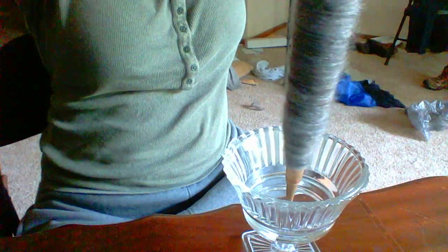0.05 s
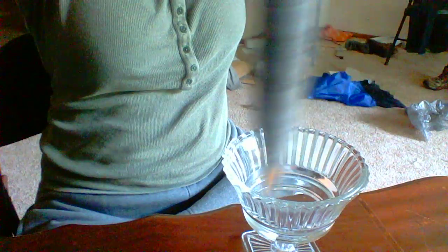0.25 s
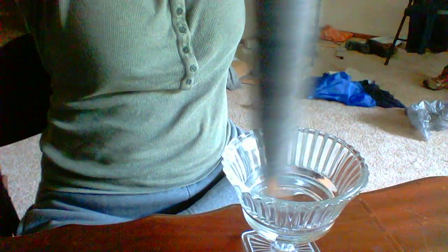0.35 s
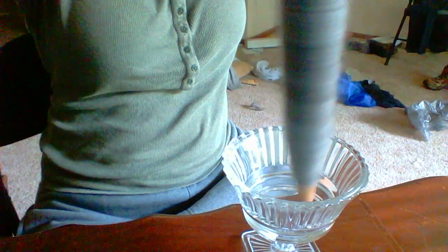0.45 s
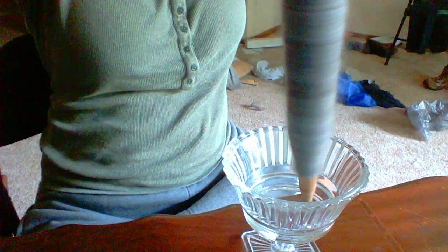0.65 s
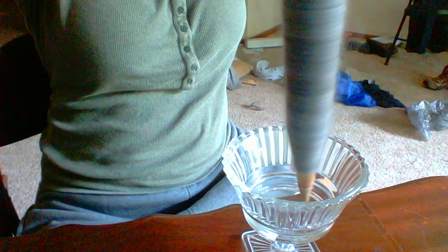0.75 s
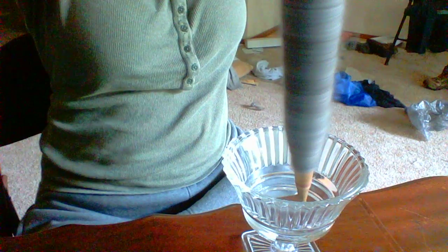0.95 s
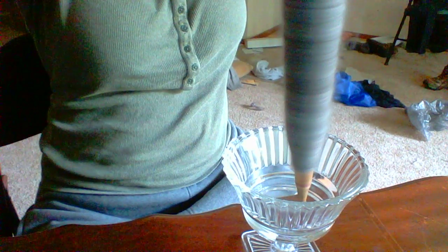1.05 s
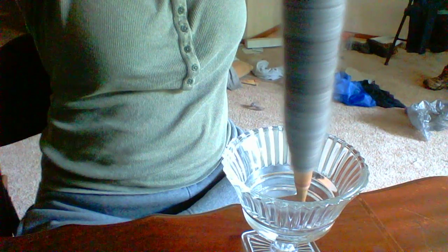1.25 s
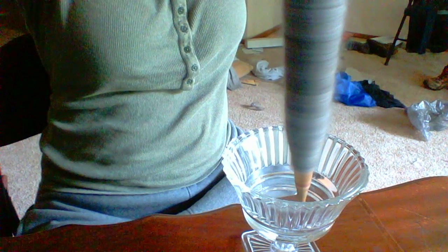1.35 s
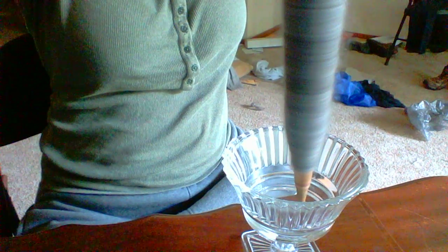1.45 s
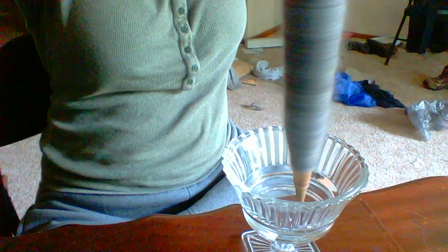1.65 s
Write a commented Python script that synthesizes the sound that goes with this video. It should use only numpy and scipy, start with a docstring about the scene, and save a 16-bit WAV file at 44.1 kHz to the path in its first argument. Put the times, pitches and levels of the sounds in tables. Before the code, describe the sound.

A wooden spindle knocks hard against a glass bowl and briefly rattles, then twirls with a low, slowing rumble and faint rubbing on the glass. A small close microphone indoors overloads on the knock, over light hiss.

```python
"""Spindle in a glass bowl

A wooden spindle is flicked into a spin in a glass bowl on a wooden table. Its tip ticks, knocks hard
against the bowl, rebounds and settles. It then twirls, shaking the table and rubbing the glass once
a turn as it slows. A small nearby microphone overloads on the knock.
Underneath: hiss, rumble, hum and a faint pulsing whine."""
import sys
import numpy as np
from scipy.fft import rfft, irfft, next_fast_len
from scipy.io import wavfile
from scipy.ndimage import map_coordinates

SR = 44100
rng = np.random.default_rng(int(sys.argv[2]) if len(sys.argv) > 2 else 0)


def log_audio(samples):
    """Write samples as a 16-bit WAV file to the path given in sys.argv[1]."""
    # one column per channel
    frames = np.atleast_2d(samples).T
    # limit to full scale, then quantise
    limited = np.clip(frames, -1, 1)
    pcm = np.round(limited * 32767).astype(np.int16)
    wavfile.write(sys.argv[1], SR, pcm)


N = 74970

# hiss spectrum: freq_hz, relative_db
HISS_SPECTRUM = [(200, 3.5), (400, -5), (800, -7), (1500, -8), (3000, -13), (6000, -15), (9000, -17.5),
                 (11000, -24.5), (13000, -36), (15500, -81)]
# room rumble spectrum: freq_hz, relative_db
RUMBLE_SPECTRUM = [(15, -1), (28, 3), (45, 2), (85, 10.5), (130, -1.5), (220, -11), (330, -14.5),
                   (700, -49.5)]
# hum envelope: time_s, level_db
HUM_LEVEL = [(0, -34.5), (.12, -34.5), (.22, -41.5), (.62, -51), (.85, -36), (1.05, -38), (1.28, -43),
             (1.52, -36), (1.7, -49)]
# table rocking envelope: time_s, level_db
SWAY_LEVEL = [(.13, -44), (.195, -28), (.232, -11), (.258, -17), (.275, -28.5), (.305, -1), (.36, -7.5),
              (.435, -6.5), (.465, -24), (.53, -16), (.58, -60)]
# light touches of the tip: start_s, level_db, pitch_hz
TIP_TICKS = [(0.206, -30, 4600), (0.2227, -14, 2200)]
# lightly touched glass: freq_hz, relative_db, t60_s
GLASS_MODES = [(1100, 1.5, 0.035), (1824, -4, 0.034), (1960, -16, 0.23), (2270, -1, 0.032)]
# blows of the tip: start_s, gain_db, lowpass_hz
TIP_KNOCKS = [(0.2772, 2.5, 2560), (0.2818, -0.5, 5040), (.2892, -9.5, 5000), (0.3376, -0.5, 860),
              (.388, -22.5, 910), (0.465, -17.5, 333)]
# bowl on the table: freq_hz, relative_db, t60_s
BOWL_MODES = [(86.9, -6.5, 0.57), (101.4, -5, 0.52), (152.5, -20, 0.99), (200.8, -23.5, 0.73),
              (277.3, -3.5, 0.28), (301.7, -0.5, 0.13), (360.6, -2.5, 0.2), (496.1, -4, 0.12),
              (600, -20, 0.31), (671, -18.5, 0.44), (786.6, 2.5, 0.085), (809, -16.5, 0.3),
              (1104, -7, 0.087), (1500, -8, 0.038), (2236, -19, 0.031)]
# clatter of a blow: freq_hz, relative_db
CLATTER_SPECTRUM = [(200, 8), (800, 11.5), (1100, -3), (2200, 11), (2700, -48), (3300, -22), (4200, -43),
                    (10000, -26), (16000, -39)]
# dense ringing of table and room: freq_hz, relative_db
BOOM_SPECTRUM = [(100, 3), (200, -8.5), (280, 9), (380, 9.5), (450, -11.5), (640, 1), (820, 2.5),
                 (920, -13), (2200, -28), (4000, -36)]
# contacts of the pressed tip: start_s, level_db, pitch_hz
TIP_CHATTER = [(0.2792, -9, 3400), (.2835, -2.5, 3000), (0.2913, -8.5, 3200), (0.3055, -19, 1900),
               (0.3288, -19, 1470), (0.3377, -19, 1400), (0.3416, -11.5, 1400), (0.344, -15, 1500),
               (0.3519, -11, 1450), (0.3581, -12, 1400), (0.3896, -20, 1310)]
# spindle speed: time_s, turns_per_s
SPIN_SPEED = [(.55, 31), (.62, 29.2), (.7, 27.8), (.8, 27), (.95, 26.2), (1.03, 25.3), (1.15, 22),
              (1.28, 21.5), (1.41, 19), (1.52, 20), (1.7, 19.3)]
# twirl envelopes: time_s, even_shake_db, odd_shake_db, rub_db, sing_db
TWIRL_LEVELS = [(.1, -68, -59, -61, -81), (.22,  -52, -34, -45.5, -71), (.42, -45, -41.5, -44, -72),
                (.58, -23.5, -53, -47.5, -53.5), (.66, -22, -48, -47, -37.5), (.79, -20.5, -52, -44, -41),
                (.89, -17.5, -33, -41, -36), (.98, -19, -34.5, -42, -38), (1.1, -26.5, -32.5, -47, -53.5),
                (1.24, -48, -32, -51.5, -59.5), (1.32, -35, -35.5, -67, -61), (1.4, -44, -27, -44.5, -53),
                (1.47, -40, -32, -52, -52.5), (1.57, -21, -34.5, -44.5, -54.5), (1.7, -43, -35.5, -59, -72)]
# shaking force at 1, 2, 3... times the spin rate: relative_db
SHAKE_ORDERS = [-25.5, 13, 1, -1.5, -5.5, -8, -10.5, -0.5]
# table resonances: centre_hz, width_hz, relative_db
TABLE_PEAKS = [(58.6, 12.7, -4.5), (114, 15.9, 0.5), (185, 35.4, -12)]
# rubbed glass resonances: centre_hz, width_hz, relative_db
RUB_PEAKS = [(287.7, 20, 0), (357, 12.8, 6), (528, 57, -7.5), (661, 93, -8.5), (798.4, 27.4, -4.5),
             (1140, 240, -18)]
# nudged glass resonances: centre_hz, width_hz, relative_db
SING_PEAKS = [(349, 26, 1), (507, 32, 3), (785, 67, -6)]

TIME_S = np.arange(N) / SR


def amp(db):
    """Decibels to gain."""
    return 10 ** (np.asarray(db) / 20)


def unit(x):
    """Scale to rms 1."""
    return x / np.sqrt(np.mean(x ** 2) + 1e-20)


def curves(rows):
    """Per-sample curve for each column after time_s."""
    times_s, *columns = np.transpose(rows)
    return [np.interp(TIME_S, times_s, column) for column in columns]


def wobble(knots_per_s):
    """Smooth random curve."""
    return map_coordinates(rng.standard_normal(400), [TIME_S * knots_per_s], mode="mirror")


def filtered(x, response):
    """Apply a complex frequency response."""
    size = next_fast_len(N + SR // 2)
    return irfft(rfft(x, size) * response(np.fft.rfftfreq(size, 1 / SR)), size)[:N]


def noise(spectrum):
    """Shaped noise, rms 1."""
    freq_hz, db = np.transpose(spectrum)
    white = rng.standard_normal(N)
    return unit(filtered(white, lambda hz: amp(np.interp(np.log(hz + 1), np.log(freq_hz), db))))


def resonate(x, peaks):
    """Parallel band-pass resonances, alternating in sign."""
    def response(hz):
        total = 0
        for k, (centre_hz, width_hz, db) in enumerate(peaks):
            damping = 1j * hz * width_hz
            total += (-1) ** k * amp(db) * damping / (centre_hz ** 2 - hz ** 2 + damping)
        return total
    return filtered(x, response)


def decay(start_s, t60_s, rise_s=0.0005):
    """Fast rise, exponential fall."""
    age_s = np.maximum(TIME_S - start_s, 0)
    return (1 - np.exp(-age_s / rise_s)) * amp(-60 * age_s / t60_s)


def sine(hz, zero_s=0, phase_rad=0):
    """Sine with its phase counted from zero_s."""
    return np.sin(2 * np.pi * hz * (TIME_S - zero_s) + phase_rad)


def ringing(start_s, modes):
    """Struck modes; levels vary slightly per strike."""
    return sum((-1) ** k * amp(db + rng.normal(0, 1)) * decay(start_s, t60_s) * sine(hz, start_s)
               for k, (hz, db, t60_s) in enumerate(modes))


def click(start_s, hz, t60_s):
    """Hard contact: a few cycles, abrupt onset."""
    return decay(start_s, t60_s, rise_s=0.00005) * sine(hz, start_s)


def background():
    """Hiss, room rumble, wavering hum, faint pulsing whine."""
    hum_db, = curves(HUM_LEVEL)
    hum = amp(hum_db) * sine(hz=200, phase_rad=0.55 * wobble(24))
    pulse_period_s, pulse_peak_s = 0.0747, 0.84
    whine_db = -69.5 + 14 * np.cos(2 * np.pi * (TIME_S - pulse_peak_s) / pulse_period_s)
    whine = amp(whine_db) * sine(hz=3475, phase_rad=wobble(34.2))
    return amp(-47) * noise(HISS_SPECTRUM) + amp(-37) * noise(RUMBLE_SPECTRUM) + hum + whine


def table_sway():
    """Flick and knock rock the table."""
    sway_db, = curves(SWAY_LEVEL)
    return amp(sway_db) * sine(hz=56.4, zero_s=SWAY_LEVEL[0][0])


def ticks():
    """Light touches of the tip leave the glass free to ring."""
    return sum(amp(db) * (click(start_s, hz, t60_s=0.0065) + amp(-13) * ringing(start_s, GLASS_MODES))
               for start_s, db, hz in TIP_TICKS)


def knocks():
    """Each blow rings bowl and table, with a short clatter and a dense boom; late blows are duller."""
    out = np.zeros(N)
    for start_s, gain_db, lowpass_hz in TIP_KNOCKS:
        ring = amp(-4.5) * ringing(start_s, BOWL_MODES)
        clatter = amp(-6) * decay(start_s, t60_s=0.036) * noise(CLATTER_SPECTRUM)
        boom = amp(-5.5) * decay(start_s, t60_s=0.24) * noise(BOOM_SPECTRUM)
        blow = filtered(ring + clatter + boom, lambda hz: 1 / (1 + 1j * hz / lowpass_hz) ** 2)
        out += amp(gain_db) * blow
    return out


def chatter():
    """The tip cracks and chatters while pressed against the glass."""
    return sum(amp(db) * click(start_s, hz, t60_s=0.0025) for start_s, db, hz in TIP_CHATTER)


def table_shake(turns, even_db, odd_db):
    """Imbalance shakes the table at multiples of the spin rate, over a noisy grumble."""
    orders = [amp(db) * (1 + 0.1 * wobble(24.74)) * np.cos(2 * np.pi * order * turns)
              for order, db in enumerate(SHAKE_ORDERS, start=1)]
    grumble = amp(-18) * unit(resonate(rng.standard_normal(N), TABLE_PEAKS))
    odd = unit(resonate(sum(orders[::2]), TABLE_PEAKS)) + grumble
    even = unit(resonate(sum(orders[1::2]), TABLE_PEAKS)) + grumble
    return amp(even_db) * even + amp(odd_db) * odd


def glass_rub(turns):
    """Friction noise through the glass, swelling once a turn."""
    swing_db, lag_turns = 3.5, 0.29
    swell = amp(swing_db * np.cos(2 * np.pi * (turns - lag_turns)))
    return unit(resonate(rng.standard_normal(N), RUB_PEAKS) * swell)


def glass_sing(turns):
    """One slightly uneven nudge a turn makes the glass sing."""
    whole_turns = np.floor(turns)
    nudges = np.diff(whole_turns, append=whole_turns[-1]) * (1 + 0.1 * wobble(27.5))
    return unit(resonate(resonate(nudges, SING_PEAKS), SING_PEAKS))


def twirl():
    """The slowing spindle drives shake, rub and singing from one rotation."""
    turns_per_s, = curves(SPIN_SPEED)
    even_db, odd_db, rub_db, sing_db = curves(TWIRL_LEVELS)
    heavy_side_s = 0.868  # rotation phase zero
    turns = np.cumsum(turns_per_s) / SR
    turns -= np.interp(heavy_side_s, TIME_S, turns)
    shake = table_shake(turns, even_db, odd_db)
    return shake + amp(rub_db) * glass_rub(turns) + amp(sing_db) * glass_sing(turns)


def scene():
    """All sources, mono."""
    return (knocks() + table_sway() + ticks() + chatter() + twirl() + background())[None]


def record(dry):
    """The microphone clips at full scale, then cuts off above its band limit."""
    knee, top_hz = 30, 15700
    clipped = dry[0] / (1 + np.abs(dry[0]) ** knee) ** (1 / knee)
    return filtered(clipped, lambda hz: 1 / (1 + (hz / top_hz) ** 120))[None]


dry = scene()
out = record(dry)
log_audio(out)
```